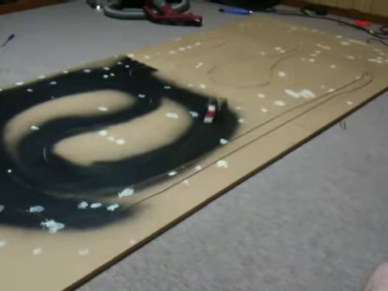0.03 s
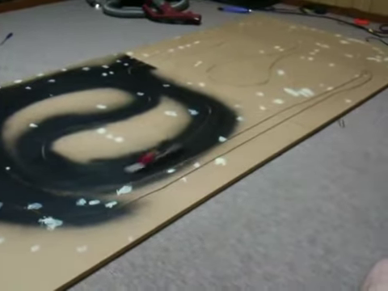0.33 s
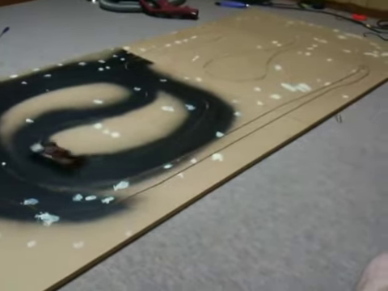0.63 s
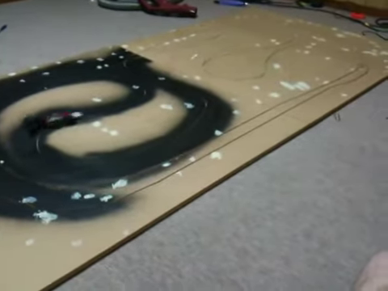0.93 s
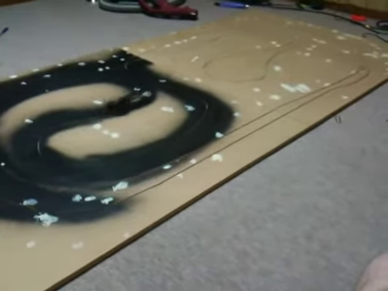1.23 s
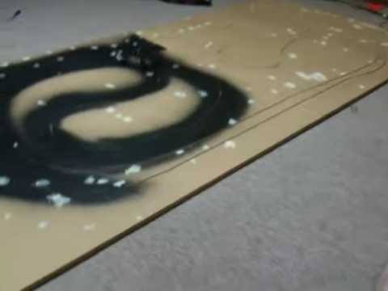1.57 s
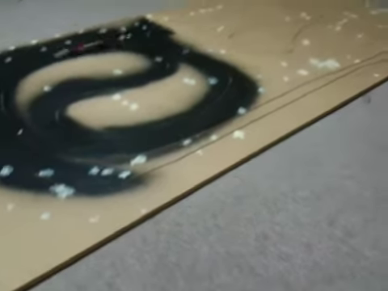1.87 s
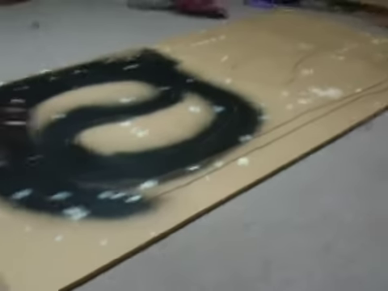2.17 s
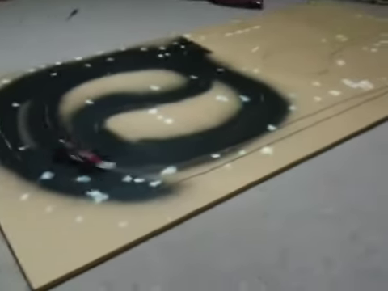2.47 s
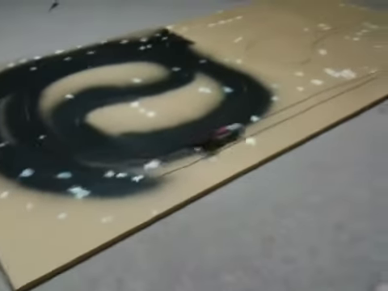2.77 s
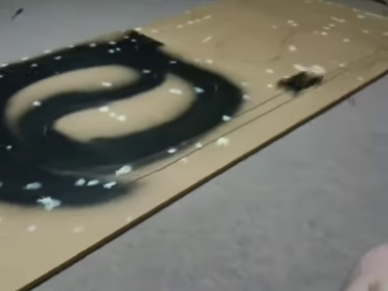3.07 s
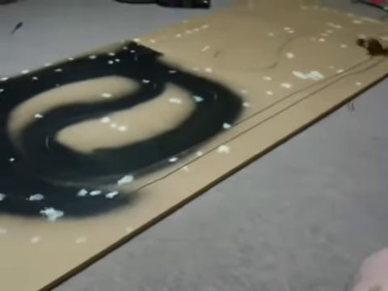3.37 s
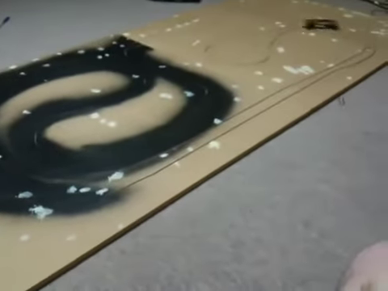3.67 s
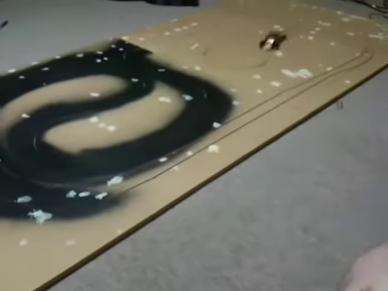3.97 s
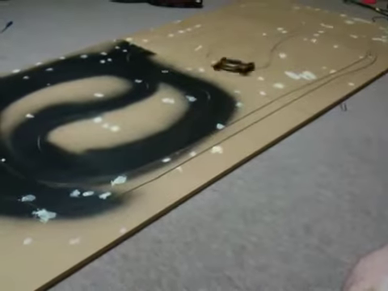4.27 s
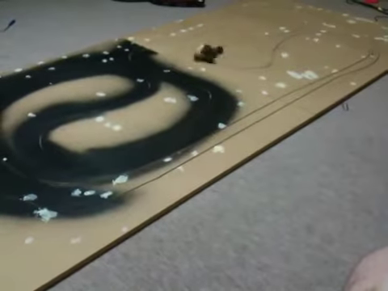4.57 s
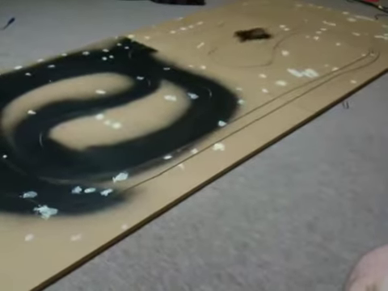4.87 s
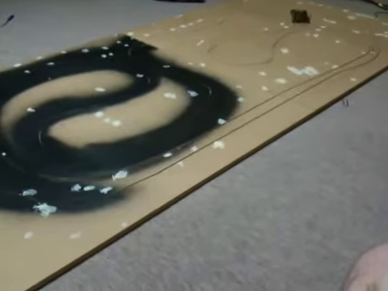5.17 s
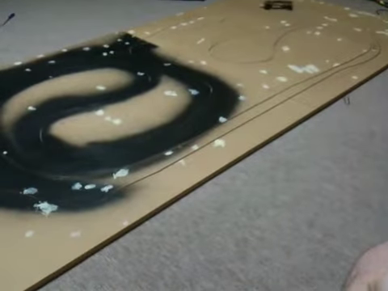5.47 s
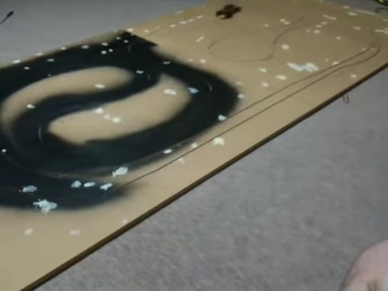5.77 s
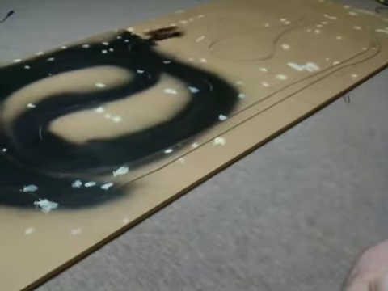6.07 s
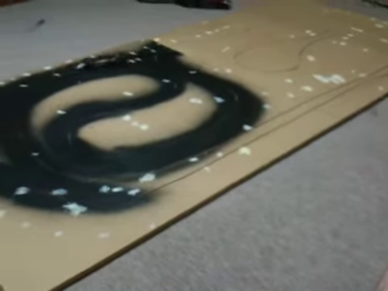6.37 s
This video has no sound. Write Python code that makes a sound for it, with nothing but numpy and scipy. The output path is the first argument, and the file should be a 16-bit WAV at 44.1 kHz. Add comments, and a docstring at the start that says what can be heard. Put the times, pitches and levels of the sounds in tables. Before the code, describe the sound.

A small electric slot car runs on a wooden track for about six and a half seconds. Its gears and metal contacts make a bright, scratchy, whirring rasp that swells and falls about three times a second, dropping to a quieter coast between squeezes of the throttle. Most surges bring a soft, hollow knock. The rasp rings slightly in a bend at 2.4 seconds and is strongest between 2.5 and 2.9.

Underneath, the tyres drum softly, and bumps make short, low thuds, frequent from the start until about 3.8 seconds, then sparse and gone by 5. The car's guide ticks sharply against the slot at about 0.8, 1.5, 2.5 and 3 seconds, four times quickly between 4.1 and 4.3, and again at 5.4 and 6.2. The car is still running at the end. The carpeted room has very little echo and only faint background noise.

```python
"""Slot car on a wooden track

A slot car laps a wooden track in a carpeted room, driven in short squeezes of the throttle.
Its gears and pickup braids (the metal strips that collect power) rasp through the plastic body.
The tyres drum on the board, bumps make it thud, and a soft knock comes with each burst of power.
Now and then the guide blade, which steers the car, ticks against the wall of the slot."""
import sys
import numpy as np
from scipy import signal
from scipy.fft import rfft, irfft, next_fast_len
from scipy.io import wavfile
from scipy.ndimage import uniform_filter1d, map_coordinates

SR = 44100
rng = np.random.default_rng(int(sys.argv[2]) if len(sys.argv) > 2 else 0)


def master_out(mix):
    """Clip the mix to full scale and print it as 16-bit PCM to the path in sys.argv[1]."""
    frames = np.transpose(np.atleast_2d(mix))
    ceiling = np.clip(frames, -1, 1)
    pcm = np.round(ceiling * 32767).astype(np.int16)
    wavfile.write(sys.argv[1], SR, pcm)


N = 282240

# Throttle squeezes. At each one's spot on the track, the shell aims one band of sound at the listener,
# and sound bouncing between car and board adds a "comb" of evenly spaced peaks.
# (time [s], level [dB], time to fall 10 dB [s], aimed band [Hz], its boost [dB],
#  comb spacing [Hz], comb height [dB])
SQUEEZES = [(0.043, -34.0, 0.17, 5600.0, 2, 2250.0, -1), (0.368, -35, 0.105, 1700.0, 1.2, 4170, -0.5),
            (0.79, -32.5, 0.126, 3650.0, 4.5, 2200.0, 4), (0.991, -35.5, 0.09, 2150.0, 3.5, 4100, 2),
            (1.28, -38, 0.09, 1850.0, 1, 3200.0, 2), (1.546, -33.0, 0.1, 5600.0, 4.5, 3440, -1),
            (1.882, -35.5, 0.104, 4250.0, 2, 2670, 9.5), (2.159, -37.5, 0.15, 4100.0, 2.5, 2670, 5),
            (2.531, -31.5, 0.11, 6140, 0.5, 2340, 5), (2.861, -29, 0.06, 6600, 4.5, 3200.0, 2.5),
            (3.194, -33.5, 0.06, 6700, 3, 3000.0, 0), (3.808, -36.5, 0.13, 3100, 1.5, 2750.0, 2.9),
            (4.165, -33, 0.1654, 4250.0, 3, 2630, 2), (4.337, -36.0, 0.1, 1700.0, 4, 2630, 5),
            (4.634, -32.5, 0.144, 4850.0, 5.5, 2900, 4), (4.973, -34.6, 0.12, 4430, 2.6, 2550.0, 4),
            (5.374, -34.6, 0.123, 4100.0, 3.8, 2700.0, 4.5), (5.744, -35.0, 0.14, 3650.0, 3.5, 2500.0, 7),
            (6.069, -35, 0.14, 4850.0, 3.2, 2350.0, 0.5)]
# The rasp of the car coasting between squeezes: (time [s], level [dB])
COASTING = [(0.0, -44), (0.25, -55.0), (0.62, -42.5), (0.75, -51.8), (1.15, -48.7), (2.05, -49.0),
            (2.35, -45.1), (2.68, -38.5), (3.03, -43), (3.38, -40.7), (3.66, -47.0), (4.02, -48),
            (4.85, -44.5), (5.22, -47), (5.56, -51.5), (5.95, -47.0), (6.22, -40), (6.4, -48.3)]
# The overall tone of the rasp: (frequency [Hz], gain [dB])
RASP_TONE = [(100, -40), (400, -13), (900, -10), (1300, -4), (2200, -1), (2800, -1), (4200, 0), (5300, -1),
             (8000, -1), (11000, -2.7), (14000, -4.3), (16000, -5.3)]
# Pitches at which the car rings: (frequency [Hz], width [Hz], boost [dB])
CAR_RINGS = [(1642, 496, 7.5), (3417, 640, 7.5), (3792, 252, 9), (4117, 244, 5.5), (4445, 300, 6),
             (4867, 520, 6.5), (5770, 640, 7.5), (6464, 755, 10.5), (7340, 420, 5), (8460, 620, 3),
             (9540, 530, 2.5)]
# The band each body panel gives off:
# (frequency [Hz], width [Hz], boost at full power [dB], extra boost as the throttle eases [dB per dB])
PANEL_BANDS = [(1800, 1600, 0, 0.32), (3630, 1300, 1.3, 0.0838), (4780, 400, 1.0, 0.06),
               (6300, 1600, 0.53, .04)]
# The car slides in a bend and the tyres squeal: (time [s], boost [dB], length [s])
BEND_SLIDES = [(2.44, 7.5, .18), (5.97, 4, .15)]
# The treble of the rasp drifts up and down: (time [s], gain [dB])
TREBLE_DRIFT = [(0.0, -0.8), (0.62, 1.1), (1.5, -2.5), (1.76, 1.5), (2.04, -0.7), (2.16, 0.3), (3.06, -0.7),
                (3.52, 1.5), (4.14, -1.5), (4.32, 1), (4.5, 0.2), (5.18, 0.5), (5.58, -1), (6.4, 1.5)]
# The tone of the board's deep drumming: (frequency [Hz], gain [dB])
BOARD_TONE = [(20, -42), (45, -26.5), (70, -18), (100, -6.5), (135, -0.5), (190, 1), (250, -6.5),
              (350, -26), (600, -32), (2000, -85)]
# That drumming is weak at the far end of the board: (time [s], level [dB])
BOARD_LOUDNESS = [(0.0, -40), (0.24, -53.5), (0.32, -46.5), (1.44, -45.5), (1.5, -53), (1.6, -41.5),
                  (1.86, -49), (1.98, -39), (2.12, -49), (2.7, -47), (2.76, -55.5), (3.28, -47),
                  (4.36, -53.0), (4.5, -62.5), (4.96, -64), (5.1, -54), (5.32, -70), (6.4, -60)]
# The tone of the rolling tyres: (frequency [Hz], gain [dB])
TYRE_TONE = [(60, -35), (150, -16), (260, -0.5), (340, 1), (410, -6.5), (550, -11.5), (800, -20),
             (1300, -25.5), (3000, -52)]
# The tyres are loudest in tight bends: (time [s], level [dB])
TYRE_LOUDNESS = [(0.0, -57), (1.16, -51), (1.24, -56.5), (2.34, -51), (3.14, -63), (3.2, -57),
                 (3.98, -57.5), (4.12, -65.5), (4.32, -45.5), (4.5, -58.5), (4.82, -55.5), (4.9, -65.5),
                 (5.0, -56), (5.52, -65.5), (5.92, -58), (6.04, -67), (6.14, -53.5), (6.4, -56.5)]
# The room's faint background noise: (frequency [Hz], gain [dB])
BACKGROUND_TONE = [(20, -34), (60, -33), (120, 4), (300, -7), (1000, -0.5), (4000, -4.5), (16000, -15.5)]
# Bumps in the track: (time [s], level [dB], pitch [Hz])
TRACK_BUMPS = [(0.039, -25, 140), (0.114, -28.5, 161), (0.135, -26.5, 156), (0.62, -30, 154),
               (0.787, -34.5, 216), (0.881, -31.5, 174), (0.925, -31.5, 165), (0.965, -32, 150),
               (1.026, -31.5, 165), (1.175, -36.5, 328), (1.299, -31.5, 165), (1.38, -34, 261),
               (1.489, -27, 186), (1.572, -31.5, 212), (2.047, -33, 215), (2.213, -32.5, 159),
               (2.549, -32.5, 160), (2.625, -33.5, 170), (2.721, -33.5, 166), (2.925, -34.5, 192),
               (3.195, -35, 180), (3.275, -29, 170), (3.413, -26.5, 151), (3.614, -30, 149),
               (3.805, -32.5, 219), (4.328, -31, 334), (4.338, -33.5, 215), (4.704, -42, 326),
               (4.812, -41, 346)]
# Knocks under full power: (time [s], level [dB])
POWER_KNOCKS = [(0.044, -40.5), (0.366, -44), (0.791, -49), (0.997, -38.5), (1.274, -43), (1.564, -42),
                (1.887, -42.5), (2.162, -44), (2.544, -39.5), (2.884, -43.5), (3.205, -40.5),
                (3.417, -43.5), (3.821, -44.5), (4.222, -47), (4.329, -40), (4.663, -44.5), (4.995, -45),
                (5.389, -43.5), (5.773, -42.5), (6.082, -41.5)]
# How long the room echoes: (frequency [Hz], time to fade 60 dB [s])
ROOM_FADE = [(200, 0.11), (2000, 0.34), (12000, .18)]
# The guide blade hits the slot wall: (time [s], level [dB], pitch [Hz])
GUIDE_HITS = [(.827, -23, 3800), (1.472, -38, 5740), (1.517, -28, 5700), (2.513, -29, 4760),
              (2.757, -34, 6150), (3.02, -23.5, 3530), (4.1105, -32, 3700), (4.159, -29, 4750),
              (4.254, -23, 4360), (4.3265, -25, 5020), (5.3695, -31, 3580), (6.203, -27, 4340)]


def amp(db):
    """Turn decibels into a factor to multiply by."""
    return 10 ** (np.asarray(db) / 20)


def unit(x):
    """Scale x to an average strength (rms) of 1."""
    return x / np.sqrt(np.mean(x ** 2) + 1e-20)


def along(points, hz):
    """Read between the rows of a frequency table, on a log scale."""
    freqs, values = np.transpose(points)
    return np.interp(np.log(hz + 1), np.log(freqs + 1), values)


def curve(points):
    """Join (time, value) points with lines, one value per sample."""
    return np.interp(np.arange(N) / SR, *np.transpose(points))


def wobble(rate):
    """A smooth curve through `rate` random values a second."""
    return map_coordinates(rng.standard_normal(int(N * rate / SR) + 4), [np.arange(N) * rate / SR])


def filtered(x, response):
    """Scale each frequency in x by response(hz)."""
    size = next_fast_len(N + SR // 2)
    return irfft(rfft(x, size) * response(np.fft.rfftfreq(size, 1 / SR)), size)[:N]


def noise(tone):
    """Noise of strength 1, shaped by a tone table."""
    return unit(filtered(rng.standard_normal(N), lambda hz: amp(along(tone, hz))))


def bell(x, centre, width):
    """A hump of height 1, with the given width halfway up."""
    return .5 ** ((2 * (x - centre) / width) ** 2)


def add(track, s, sound):
    """Mix a sound into a track, s seconds in."""
    start = max(0, round(s * SR))
    track[start:start + len(sound)] += sound[:len(track) - start]


def fade(t, t60):
    """A fade that drops 60 dB every t60 seconds."""
    return np.exp(-np.log(1000) * t / t60)


def ring(hz, t60, attack_s):
    """One fading note of a struck object, with a peak of 1."""
    t = np.arange(SR // 8) / SR
    onset = 1 - np.exp(-(t / attack_s) ** 2)
    wave = np.sin(2 * np.pi * hz * t) * fade(t, t60) * onset
    return wave / np.abs(wave).max()


def throttle(rise_s=.085, roundness=1.45):
    """The drive level in dB: each squeeze swells and dies away over the coasting car."""
    t = np.arange(0, N, SR // 500) / SR
    power = amp(np.interp(t, *np.transpose(COASTING))) ** 2
    for s, db, fall_s, *_ in SQUEEZES:
        from_peak = np.abs(t - s) / np.where(t < s, rise_s, fall_s)
        power += amp(db - 10 * np.minimum(from_peak, 10) ** roundness) ** 2
    return np.interp(np.arange(N) / SR, t, 10 * np.log10(power))


def tooth_clashes(turns, teeth=27, scatter_db=3):
    """Worn gear teeth click as they meet, uneven in timing and strength."""
    meetings = np.flatnonzero(np.diff(np.floor(turns * teeth)))
    slack, force = rng.standard_normal((len(meetings), 2)).T
    side = rng.choice([-1, 1], len(meetings))  # either side of a tooth may strike
    blows = side * amp(scatter_db * np.minimum(force, 2))
    samples = np.clip(meetings + 4 * slack, 0, N - 1).astype(int)
    return np.bincount(samples, blows, N)


def shell_scatter(x):
    """Each clash bounces around the hollow shell for a few milliseconds."""
    t = np.arange(SR // 100) / SR
    paths = rng.standard_normal(len(t)) * fade(t, t60=.0081)
    paths /= np.linalg.norm(paths)
    paths[0] += .5  # the direct path
    spectrum = rfft(paths, SR // 10)
    smear = np.roll(irfft(spectrum / np.abs(spectrum)), SR // 200)  # spreads a click but keeps its tone
    return signal.fftconvolve(x, smear)[SR // 200:][:N]


def car_body(x):
    """The plastic shell and gears boost the pitches at which they ring."""
    def response(hz):
        rings_db = sum(db * bell(hz, centre, width) for centre, width, db in CAR_RINGS)
        return amp(along(RASP_TONE, hz) + rings_db)
    return filtered(x, response)


def moving_tone(x, drive_db, full_power_db=-35, slide_hz=4880, treble_hz=8700, flicker_db=1.1):
    """The tone shifts as the car moves: its panels turn, and echoes add up or cancel."""
    hz, t, spectra = signal.stft(x, SR, nperseg=2048, noverlap=1536)
    hz = hz[:, None]
    frames = np.minimum(t * SR, N - 1).astype(int)
    ease_db = full_power_db - drive_db[frames]
    panels = sum(bell(hz, centre, width) * (db + extra * ease_db)
                 for centre, width, db, extra in PANEL_BANDS)
    times, _, _, beam_hz, boost_db, spacing_hz, height_db = np.transpose(SQUEEZES)
    # Each spot on the track blends into the next.
    nearness = np.array([np.interp(t, times, spot) for spot in np.eye(len(times))])
    beam = (boost_db * bell(hz, beam_hz, width=1290)) @ nearness
    peaks = np.cos(np.pi * hz / (spacing_hz @ nearness)) ** 16
    comb = (height_db @ nearness) * (peaks - .2) * bell(hz, 4800, width=5500)
    slide_db = sum(db * bell(t, s, length) for s, db, length in BEND_SLIDES)
    slides = slide_db * bell(hz, slide_hz, width=580)
    treble_db = curve(TREBLE_DRIFT) + flicker_db * wobble(16)
    treble = treble_db[frames] * bell(np.minimum(hz, treble_hz), treble_hz, treble_hz / 4)
    # Paths through the room make random loud and quiet patches in pitch and time.
    patches = uniform_filter1d(rng.standard_normal(spectra.shape), size=4, axis=0)
    patches = 3 * unit(uniform_filter1d(patches, size=9, axis=1))
    gain = amp(panels + beam + comb + slides + treble + patches)
    return signal.istft(spectra * gain, nperseg=2048, noverlap=1536)[1][:N]


def gears_and_braids(drive_db, axle_hz=95, flutter_db=.7):
    """Gear teeth clash and the braids scrape, both harder under power."""
    push = unit(drive_db - drive_db.mean())
    speed = amp(1.1 * uniform_filter1d(np.roll(push, SR // 16), size=SR // 8))  # lags the throttle
    turns = np.cumsum(axle_hz * speed * amp(.6 * wobble(60))) / SR
    gears = unit(shell_scatter(tooth_clashes(turns)))
    braids = rng.standard_normal(N)
    chatter = .53 * np.sin(2 * np.pi * turns) + wobble(380)  # the wheels press harder once a turn
    pressure = amp(.77 * chatter + flutter_db * wobble(35))
    rasp = moving_tone(car_body((gears + braids) * pressure), drive_db)
    loudness = np.sqrt(np.abs(uniform_filter1d(rasp ** 2, size=SR // 12)) + 1e-20)
    return amp(drive_db + .29) * rasp / loudness  # evened out, so the throttle sets the level


def rolling(drive_db, board_lumps_db=2, tyre_lumps_db=2.5):
    """The tyres drum on the board in uneven lumps, harder under power."""
    push_db = drive_db - drive_db.mean()
    board = unit(noise(BOARD_TONE) * amp(board_lumps_db * wobble(45) + wobble(12)))
    tyres = unit(noise(TYRE_TONE) * amp(tyre_lumps_db * wobble(70) + wobble(12)))
    board_db = curve(BOARD_LOUDNESS) + .2 * push_db
    tyre_db = curve(TYRE_LOUDNESS) + .28 * push_db + 1.5
    return amp(board_db) * board + amp(tyre_db) * tyres


def track_bumps():
    """Each bump makes the board ring briefly at a low pitch."""
    out = np.zeros(N)
    for s, db, hz in TRACK_BUMPS:
        thud = ring(hz, t60=.032, attack_s=.0074) + .26 * ring(1.746 * hz, t60=.025, attack_s=.0087)
        add(out, s, amp(db - 1) * thud)
    return out


def power_knocks():
    """Each burst of power brings a short, hollow knock."""
    out = np.zeros(N)
    for s, db in POWER_KNOCKS:
        knock = ring(494, t60=.015, attack_s=.0087) + .35 * ring(578, t60=.016, attack_s=.0056)
        add(out, s - .003, amp(db + 2) * knock)
    return out


def board_bass_cut(x, cutoff_hz=85):
    """The thuds and knocks carry little deep bass."""
    return signal.sosfilt(signal.butter(3, cutoff_hz, "high", fs=SR, output="sos"), x)


def room_echo(x):
    """The carpeted room answers with a short echo."""
    hz, t, spectra = signal.stft(rng.standard_normal(SR // 2), SR, nperseg=256)
    tail = signal.istft(spectra * fade(t, along(ROOM_FADE, hz)[:, None]), SR, nperseg=256)[1]
    delayed = np.pad(tail, (SR // 200, 0)) / np.linalg.norm(tail)
    return signal.fftconvolve(x, delayed)[:N]


def guide_ticks(t60=.022, crack_hz=(2500, 8000)):
    """The guide blade snaps against the slot wall: a crack and a high ring."""
    out = np.zeros(N)
    t = np.arange(SR // 8) / SR
    band = signal.butter(1, crack_hz, "band", fs=SR, output="sos")
    for s, db, hz in GUIDE_HITS:
        crack = unit(signal.sosfilt(band, rng.standard_normal(len(t)))) * fade(t, t60)
        snap = .41 * crack + .5 * ring(hz, t60, attack_s=.00019)
        add(out, s, amp(db) * snap / np.abs(snap).max())
    return out


def scene():
    """Mix the car, the board and the room, the same in both channels."""
    drive_db = throttle()
    hits = board_bass_cut(track_bumps() + power_knocks()) + guide_ticks()
    car = gears_and_braids(drive_db) + rolling(drive_db)
    room = amp(-15.5) * room_echo(hits) + amp(-57) * noise(BACKGROUND_TONE)
    mono = car + hits + room
    return np.array([mono, mono])


def record(dry):
    """Cut away the very highest treble."""
    top_hz = 15800
    return np.array([filtered(channel, lambda hz: hz < top_hz) for channel in dry])


dry = scene()
out = record(dry)
master_out(out)
```